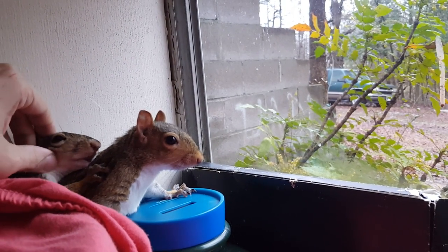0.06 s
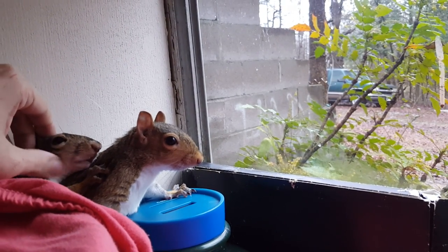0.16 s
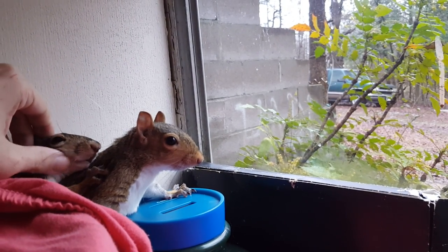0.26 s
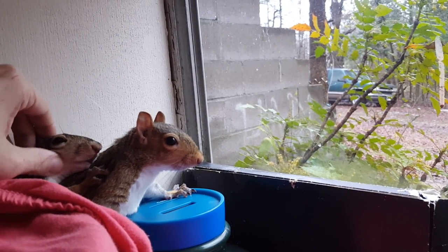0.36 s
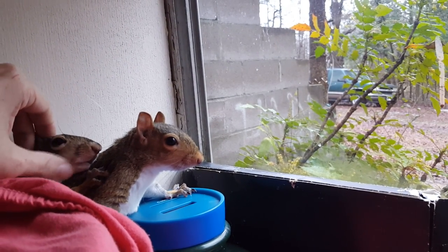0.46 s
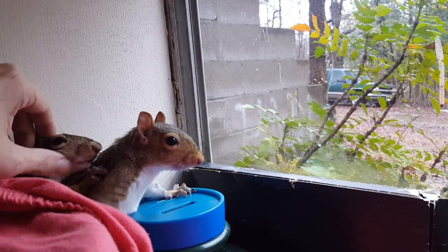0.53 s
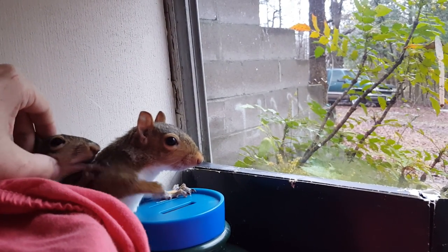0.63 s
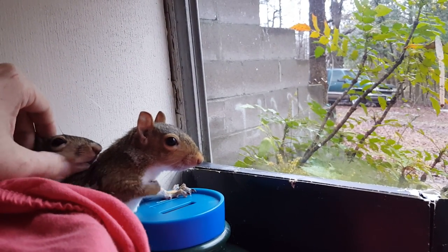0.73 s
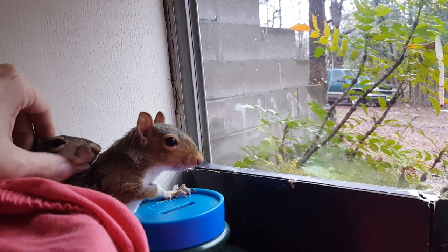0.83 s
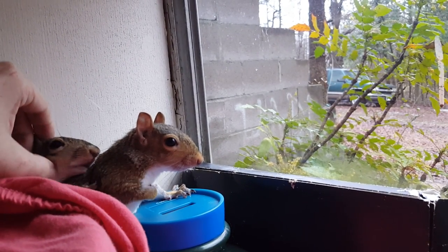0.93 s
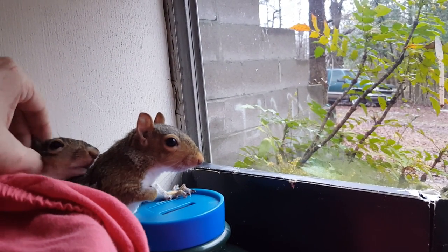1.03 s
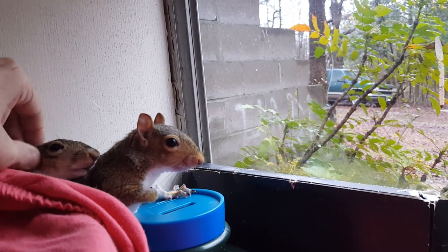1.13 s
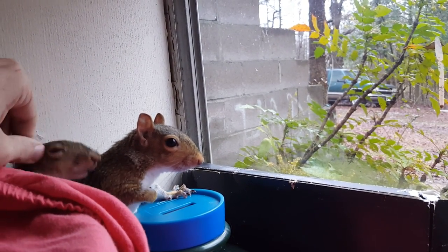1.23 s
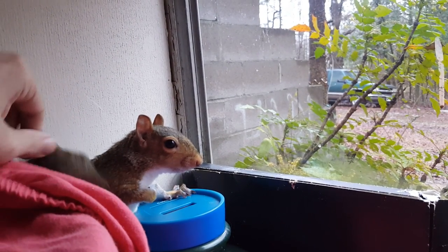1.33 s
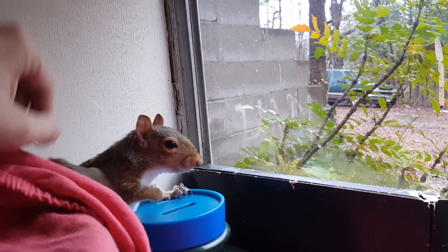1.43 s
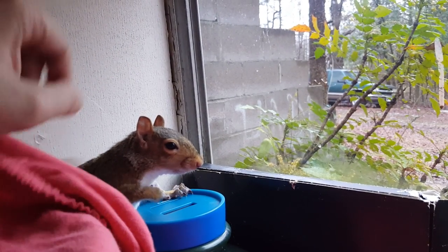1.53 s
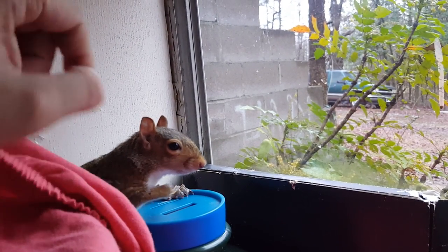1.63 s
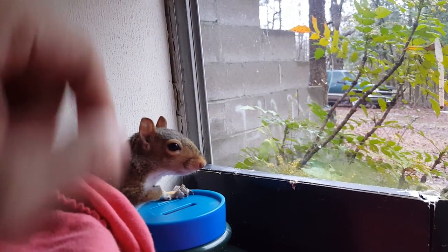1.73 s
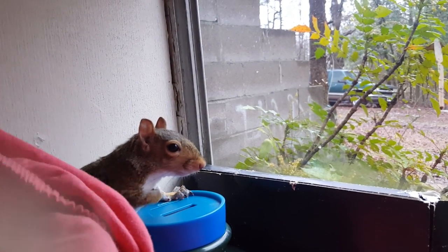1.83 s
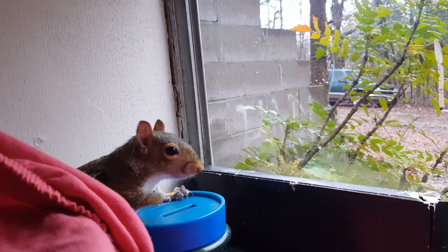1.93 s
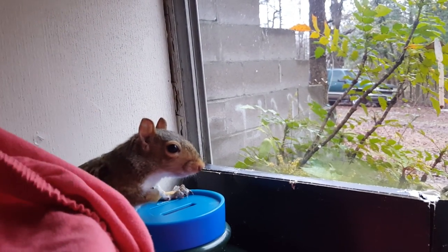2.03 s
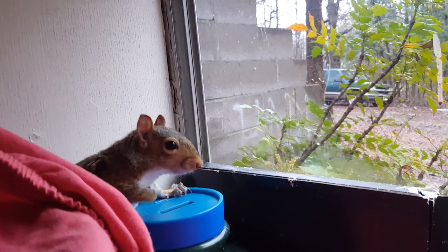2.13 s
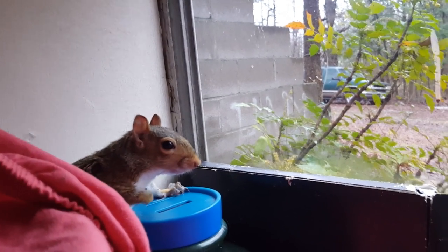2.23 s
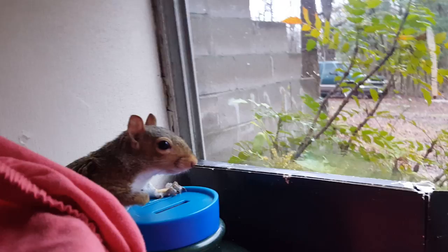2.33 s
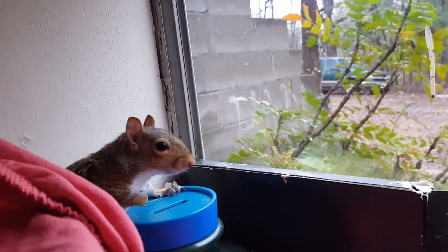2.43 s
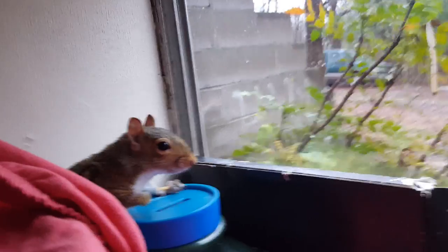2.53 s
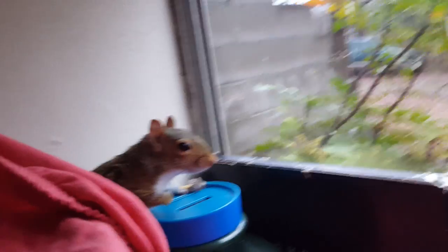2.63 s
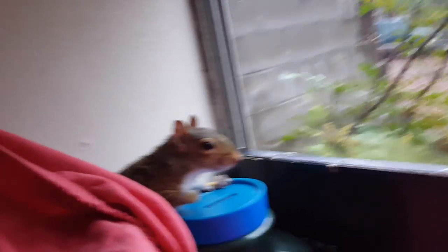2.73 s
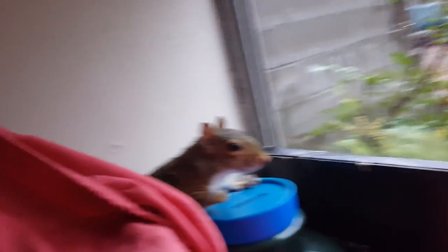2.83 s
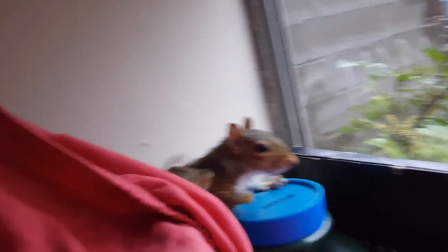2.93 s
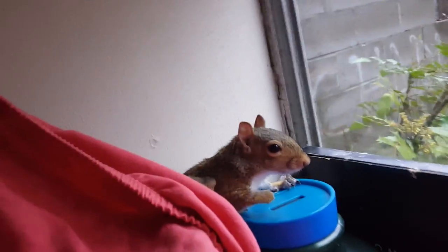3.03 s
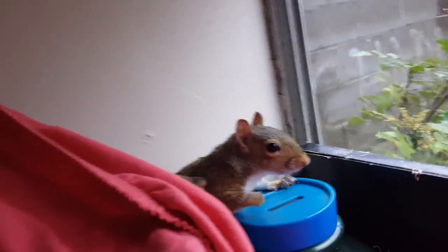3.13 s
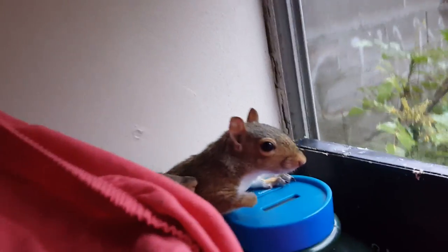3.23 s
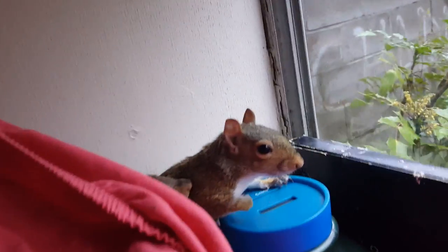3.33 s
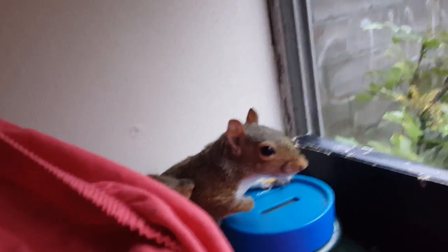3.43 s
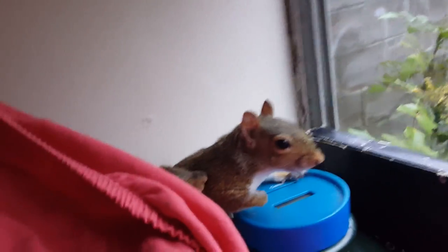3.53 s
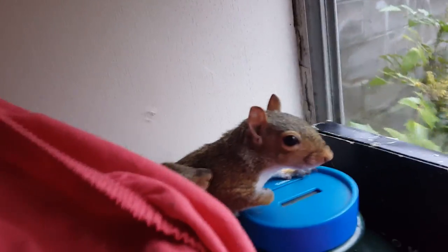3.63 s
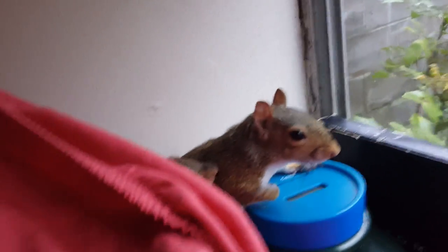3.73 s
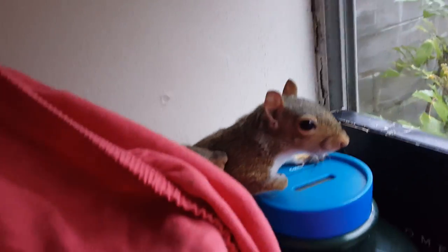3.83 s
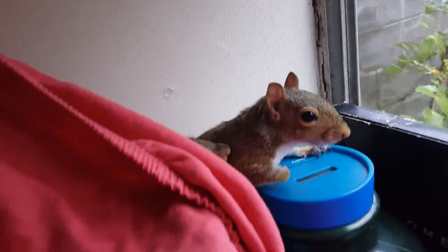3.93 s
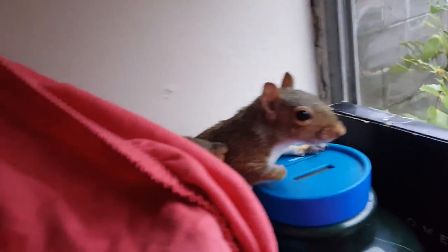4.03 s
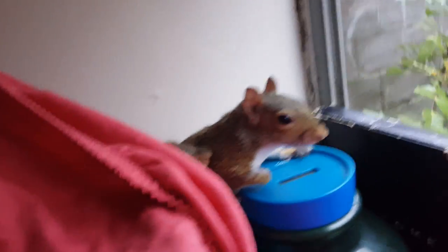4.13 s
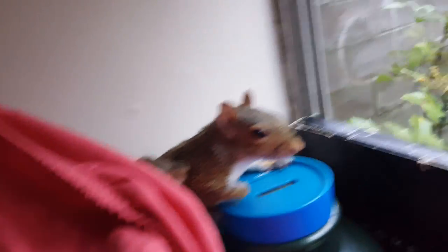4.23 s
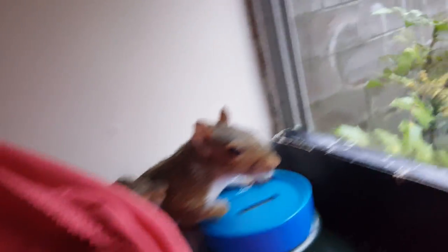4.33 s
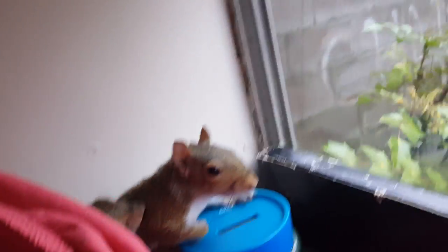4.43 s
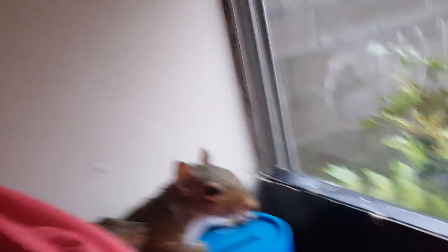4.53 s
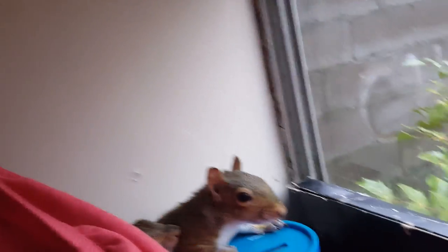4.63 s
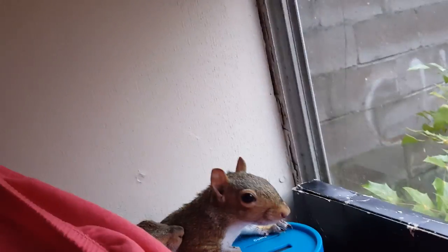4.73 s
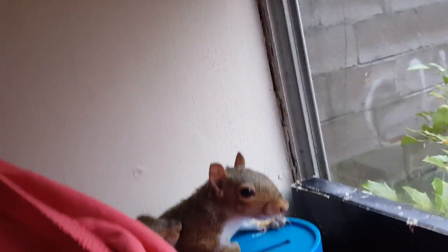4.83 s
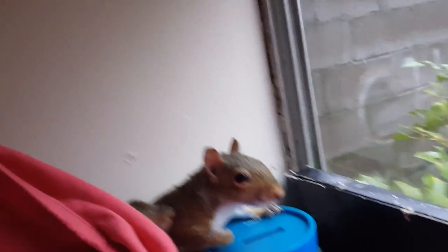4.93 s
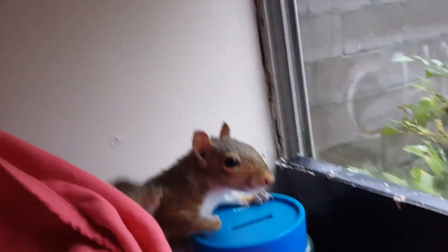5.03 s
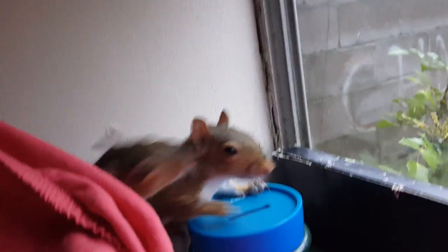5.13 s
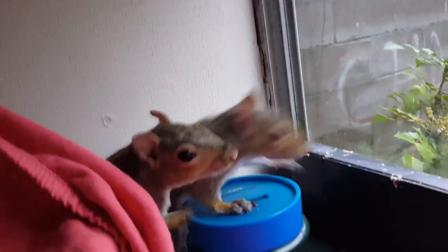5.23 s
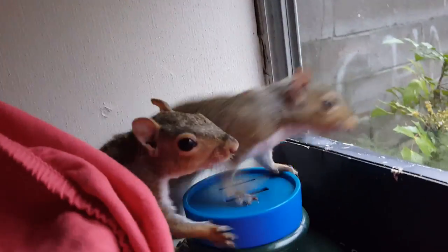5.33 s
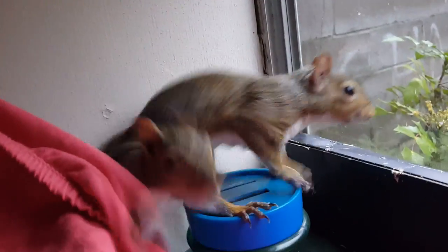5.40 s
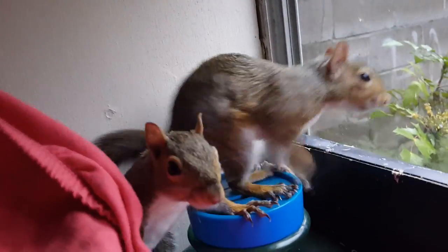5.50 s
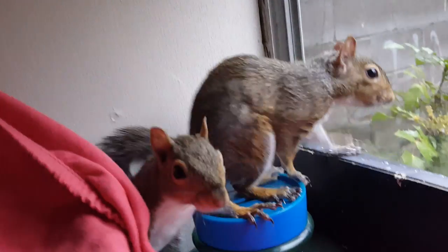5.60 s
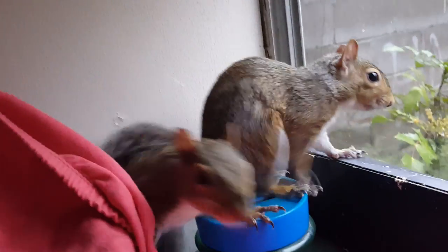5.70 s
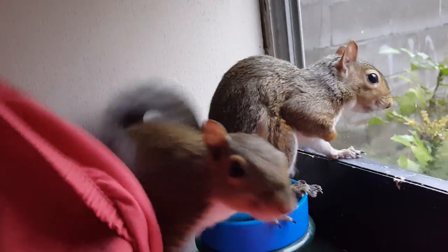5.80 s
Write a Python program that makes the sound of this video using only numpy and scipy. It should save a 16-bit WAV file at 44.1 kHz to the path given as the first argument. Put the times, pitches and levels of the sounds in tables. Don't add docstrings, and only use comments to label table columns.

```python
import sys
import numpy as np
from scipy import signal
from scipy.fft import rfft, irfft
from scipy.io import wavfile
from scipy.ndimage import uniform_filter1d

SR = 44100
rng = np.random.default_rng(int(sys.argv[2]) if len(sys.argv) > 2 else 0)


def transcribe(u):
    v = np.clip(np.atleast_2d(u).T, -1, 1)
    q = np.round(v * 32767).astype(np.int16)
    wavfile.write(sys.argv[1], SR, q)


def natural_amplitude(level_db):
    exponent = np.asarray(level_db, float) / 20
    return 10 ** exponent


N = 258426
TURN_S = (2.44, 3.88)
EDGE_HZ = 15750


def evened(x):
    return x / np.sqrt(np.mean(x ** 2) + 1e-20)


def read(points, hz):
    f, value = np.transpose(points)
    return np.interp(np.log(hz + 1), np.log(f + 1), value)


def add(mix, s, sound):
    part = mix[:, round(s * SR):][:, :sound.shape[1]]
    part += sound[:, :part.shape[1]]


def panned(db):
    return natural_amplitude(np.array([[db / 2], [-db / 2]]))


def resonate(x, hz, width_hz):
    turn = np.exp(2j * np.pi * np.cumsum(hz * np.ones(x.shape[-1])) / SR)
    r = np.exp(-np.pi * width_hz / SR)
    for _ in range(2):
        x = 2 * (turn * signal.lfilter([1 - r], [1, -r], x * turn.conj())).real
    return x


def resonate_once(x, hz, width_hz):
    turn = np.exp(2j * np.pi * hz * np.arange(1, x.shape[-1] + 1) / SR)
    r = np.exp(-np.pi * width_hz / SR)
    return 2 * (turn * signal.lfilter([1 - r], [1, -r], x * turn.conj())).real


def coloured(x, spectrum, tilt_db=0., top_hz=22000):
    hz = np.fft.rfftfreq(x.shape[-1], 1 / SR)
    db = read(spectrum, hz) + tilt_db * np.log2(np.maximum(hz, 2000) / 7000)
    return evened(irfft(rfft(x) * natural_amplitude(db) * (hz < top_hz), x.shape[-1]))


def ports(count):
    # hz, share
    alike = [(60, .995), (130, 1), (290, 0.6), (640, 0.5), (860, .3), (1050, 0), (15000, 0)]
    # hz, share
    from_left = [(800, 0), (1150, .38), (3800, .28), (5000, 0)]
    delay_s = 0.00045
    a, b = rfft(rng.standard_normal((2, count)))
    hz = np.fft.rfftfreq(count, 1 / SR)
    same = np.clip(read(alike, hz), 0, 1)
    same = same + np.clip(read(from_left, hz), 0, 1) * np.exp(-2j * np.pi * hz * delay_s)
    other = np.sqrt(np.maximum(1 - abs(same) ** 2, 0))
    return irfft(np.array([a, same * a + other * b]), count)


def fan():
    # hz, level_db_per_hz
    air_before = [(12, -61), (20, -31), (37, -47), (60, -8.5), (148, -6.5), (212, -15.5), (478, -15),
                  (514, -15), (735, -15), (789, -20), (1000, -17.5), (1180, -18), (1330, -15.5),
                  (6000, -45.5), (7800, -68), (13200, -120)]
    # hz, level_db_per_hz
    air_after = [(12, -59), (20, -28), (43, -20), (82, -14), (114, -3.5), (251, -13.5), (297, -24),
                 (478, -10.5), (607, -19), (752, -16.5), (978, -18.5), (1540, -19.5), (1650, -21.5),
                 (6000, -45.5), (7800, -84), (13200, -120)]
    # hz, left_right_db
    lean_table = [(60, -1), (110, -.6), (200, 0), (380, -0.5), (700, 3), (1290, 2), (2380, 4.5), (4400, -4),
                  (8120, 8), (15000, -18)]
    # pitch_hz, width_hz, before_db, after_db, left_right_db
    ducts = [(119, 5.4, -60, -57, -2), (145.8, 19, -61, -60.5, 1), (488.7, 27, -67.5, -59.5, -2),
             (888, 16, -74.5, -70, -6.5), (1019, 63, -69.5, -74, 10), (4080, 320, -105, -78, -2),
             (2080, 740, -69, -68, 3), (8200, 730, -89, -89, 14)]
    hz, t, z = signal.stft(ports(N + 2048), SR, nperseg=2048, noverlap=1536)
    patches = uniform_filter1d(rng.standard_normal(z.shape[1:]), 14, 0)
    patches = evened(uniform_filter1d(patches, 8, 1))
    turned = np.interp(t, TURN_S, [0, 1])
    level_db = np.outer(read(air_before, hz) - 1.5, 1 - turned) + np.outer(read(air_after, hz), turned)
    lean = read(lean_table, hz)[:, None] / 2
    z = z * natural_amplitude(level_db + 1.33 * patches + np.array([lean, -lean]))
    out = natural_amplitude(-51.5) * evened(signal.istft(z, SR, nperseg=2048, noverlap=1536)[1][:, :N])
    share = np.interp(np.arange(N) / SR, TURN_S, [0, 1])
    for pitch_hz, width_hz, before_db, after_db, pan_db in ducts:
        tone = evened(resonate(ports(N), pitch_hz, width_hz))
        out = out + tone * natural_amplitude(before_db + share * (after_db - before_db)) * panned(pan_db)
    return out


def whine():
    # pitch_hz, level_db, left_right_db
    partials = [(744, -63.5, 4), (1496, -71, -2)]

    def wander():
        return evened(uniform_filter1d(uniform_filter1d(rng.standard_normal(N), 9000), 9000))

    shadow_db = np.interp(np.arange(N) / SR, TURN_S, [-2.5, 0])
    turns = np.cumsum(1 + 0.0035 * wander()) / SR
    out = np.zeros((2, N))
    for k, (hz, db, pan_db) in enumerate(partials):
        tone = np.sin(2 * np.pi * hz * turns + np.array([[0], [0.6 * k + .5]]))
        out += np.sqrt(2) * natural_amplitude(db + 1.97 * wander() + shadow_db) * panned(pan_db) * tone
    return out


def rumble():
    # centre_s, peak_db, half_width_s, centre_hz
    swell_table = [
        (.4, -54.5, 0.18, 71),
        (2.07, -48.5, 0.3, 111),
        (3.5, -55, 0.15, 70),
        (5.3, -37.5, 0.21, 105),
        (5.65, -44, 0.11, 102),
    ]
    floor, floor_hz = natural_amplitude(-67), 140.0
    t = np.arange(N) / SR
    level, weighted_hz = floor, floor_hz * floor
    for s, db, half_s, hz in swell_table:
        swell = natural_amplitude(db) * np.exp(-((t - s) / half_s) ** 2)
        level = level + swell
        weighted_hz = weighted_hz + swell * hz
    low = resonate(ports(N), weighted_hz / level, 40.)
    return evened(low) * level * natural_amplitude(-7.5)


def squeak(s, length_s, db, start_hz, end_hz, width_hz, wavering):
    count = round(max(length_s, .02) * SR)
    a, b, uneven, waver = rng.standard_normal((4, count))

    def slow(x):
        return evened(uniform_filter1d(x, 700))

    hz = np.linspace(start_hz, end_hz, count) * (1 + wavering * slow(waver))
    tone = evened(resonate(np.array([a, 0.55 * a + 0.99 * b]), hz, width_hz))
    return s, tone * natural_amplitude(db + slow(uneven)) * signal.windows.tukey(count, .4) * panned(1.5)


def squeaks():
    # start_s, length_s, level_db, start_hz, end_hz
    rubs = [
        (0.199, 0.069, -65, 2480, 2720),
        (0.297, 0.33, -56.5, 1286, 1325),
        (0.622, 0.047, -59, 1310, 1290),
        (2.8, 0.13, -64, 960, 980),
        (3.95, 0.21, -64, 1190, 1190),
        (5.498, 0.22, -58, 1240, 1200),
        (5.7, .05, -59, 1200, 1190),
        (5.826, 0.037, -55, 1260, 1280),
    ]
    return [squeak(*row, width_hz=170., wavering=.03) for row in rubs]


def tick(s, db, hz, lid_db, length_s, tilt_db):
    # hz, level_db_per_hz
    click_colour = [(880, 2), (1500, 5), (2480, -12), (2830, -12), (3750, 3), (4730, -4), (5340, 1.5),
                    (7160, -6), (8160, -5.5), (10100, -11), (15300, -14.5), (15900, -17), (16700, -82)]
    t = np.arange(3000) / SR
    length_s = np.clip(length_s, .002, .03)
    rattle = (natural_amplitude(-9 * t / length_s) + .35 * np.exp(-t / .0007)) / (1 + (t / length_s) ** 6)
    tail = natural_amplitude(-22 - 60 * t / .07)
    uneven = evened(uniform_filter1d(rng.standard_normal(len(t)), 30))
    shape = (rattle + tail) * np.minimum(t / 0.00031, 1) * natural_amplitude(2.02 * uneven)
    top_hz = EDGE_HZ if db < -31 else 22000
    snap = coloured(rng.standard_normal((2, len(t))), click_colour, tilt_db, top_hz) * shape
    left, other = rng.standard_normal((2, len(t))) * shape
    blows = np.array([left, 0.21 * left + 1.04 * other])
    lid = resonate_once(blows, hz, 300.0 * (hz / 1500) ** 2.7) + 0.34 * resonate(blows, 1080.0, 1400.0)
    lid = signal.sosfilt(signal.butter(2, [700., 3800.], "band", fs=SR, output="sos"), lid)
    snap = snap / abs(snap).max()
    lid = lid / abs(lid).max()
    return s, natural_amplitude(db) * panned(0.29) * (snap + natural_amplitude(lid_db) * lid * panned(1))


def taps():
    # start_s, peak_db, lid_hz, lid_re_snap_db, rattle_s
    tap_table = [(.271, -57.5, 2640, 9.5, 0.011), (1.599, -52.5, 1090, 14.5, 0.034),
                 (1.925, -50, 1900, 10.5, .01), (3.029, -39.5, 1470, 11.5, 0.013),
                 (3.062, -32.5, 2280, 3.5, 0.0094), (5.178, -48, 1540, 8, .006),
                 (5.192, -48, 1540, 3, .004), (5.213, -38, 2520, 8.5, 0.0096),
                 (5.223, -39, 2780, 14, 0.0082), (5.23, -42, 1290, 18.5, 0.018),
                 (5.542, -46, 1760, -2, 0.0059), (5.629, -50, 1700, 10, 0.0053),
                 (5.649, -55, 1230, 1, .0062), (5.683, -40.5, 2330, -6, 0.0085),
                 (5.787, -56, 2480, 17, 0.014), (5.828, -50, 2470, 8, 0.0098), (5.851, -42, 2500, -1, .012),
                 (1.934, -47, 1080, 3, 0.0058), (1.603, -53, 706, 11, 0.0092)]
    return [tick(*row, tilt_db=-1) for row in tap_table]


def streaks():
    # start_s, length_s, level_db, start_hz, end_hz
    slides = [(2.183, .058, -69, 11600, 11300), (2.185, .03, -73, 6300, 6200),
              (2.205, .014, -63, 12400, 11800), (2.212, .025, -63, 6000, 5500),
              (2.265, .02, -75, 8900, 8200), (2.24, .012, -74, 4600, 4600), (2.255, .05, -79, 13000, 14500),
              (1.398, .032, -68, 8800, 8200), (1.403, .03, -70, 5600, 6200),
              (1.403, .025, -70, 15500, 15300), (1.562, .048, -68, 8300, 7800),
              (2.765, .1, -60, 1330, 1280), (3.102, .03, -69, 11000, 10800), (3.105, .02, -69, 7800, 8200),
              (2.005, .016, -58, 7600, 8600), (2.855, .07, -57, 1270, 1260), (.55, .1, -66, 1310, 1290)]
    return [squeak(*row, width_hz=.055 * row[3], wavering=.008) for row in slides]


def flick(s, db, hz, width_hz, t60_s):
    t = np.arange(2500) / SR
    ring = resonate(rng.standard_normal((2, len(t))), hz, width_hz)
    ring = coloured(ring, [(100, 0), (20000, 0)], 0, EDGE_HZ)
    return s, natural_amplitude(db - 9 - 60 * t / t60_s) * np.minimum(t / .0006, 1) * ring * panned(1.5)


def flicks():
    # start_s, peak_db, ring_hz, width_hz, t60_s
    flick_table = [(1.3178, -27, 5860, 1000, 0.022), (1.321, -33, 5350, 1200, 0.02),
                   (1.9495, -15, 15200, 700, 0.031), (1.9497, -20, 5470, 600, 0.027),
                   (1.953, -27, 5440, 700, 0.027), (1.9505, -14, 14000, 900, .015),
                   (2.205, -48, 15500, 600, .02), (2.21, -57, 11700, 1000, .05),
                   (2.221, -49, 8400, 600, .015), (2.23, -50, 9500, 600, .015),
                   (2.213, -55, 5700, 900, .04), (2.896, -50, 7000, 1500, .05),
                   (3.0, -27, 9000, 8000, .011), (3.0045, -30, 6000, 4000, .011),
                   (3.0105, -32, 11000, 6000, .011), (3.016, -32, 9000, 8000, .011),
                   (3.113, -60, 11000, 1200, .05), (3.147, -47, 14500, 3000, .012),
                   (5.311, -26, 6960, 1500, 0.024), (5.364, -21, 5460, 900, 0.036),
                   (5.427, -28, 3500, 1500, .015), (5.432, -37, 2980, 2000, .012),
                   (5.573, -46, 6000, 4000, .015), (5.59, -38, 12500, 4000, .02),
                   (5.648, -45, 6000, 1800, .015), (5.683, -48, 8300, 1200, .02),
                   (5.764, -37, 7100, 800, .02), (5.772, -34, 13900, 3500, .02),
                   (1.533, -56, 5500, 5000, .02), (1.3185, -32, 3400, 2500, .02),
                   (1.447, -50, 8280, 1210, .015), (1.592, -49, 7500, 2000, .05),
                   (1.405, -55, 5500, 1500, .05), (3.063, -40, 7500, 3000, .02),
                   (5.291, -26, 3800, 1200, 0.017)]
    return [flick(*row) for row in flick_table]


def snaps():
    # start_s, peak_db, lid_hz, lid_re_snap_db, rattle_s
    snap_table = [(1.318, -28.5, 1030, -3, 0.009), (1.448, -47, 1390, -4, 0.0072),
                  (1.9504, -15, 1850, -11, 0.0071), (2.02, -32.5, 1270, -30, 0.0052),
                  (2.371, -47.5, 1580, -4, 0.0069), (2.989, -20, 1920, -12.5, 0.0061),
                  (2.993, -28, 1900, -14, 0.004), (3.023, -22.5, 1800, -9, 0.0088),
                  (3.0595, -32.5, 2100, -18, 0.009), (3.137, -43, 1220, -5, 0.0018),
                  (3.307, -53, 1510, -15, .012), (5.1345, -43, 1500, -6, 0.005),
                  (5.262, -30, 1200, -7, .0045), (5.289, -21.5, 1240, 1, 0.0062),
                  (5.311, -18, 1180, -13, 0.005), (5.364, -16.5, 1600, -13, .011),
                  (5.404, -25, 1360, -17, 0.0045), (5.441, -19, 2580, -5, 0.0065),
                  (5.473, -22.5, 1890, -6, 0.011), (5.575, -42, 1680, -12, 0.011),
                  (5.588, -40.5, 1210, -23, .008), (5.76, -51, 1760, -10, .008),
                  (5.7725, -36, 1750, 5.5, 0.004), (5.283, -35, 1300, -17, .0044)]
    return [tick(*row, tilt_db=4 + 0.07 * (row[1] + 30)) for row in snap_table]


def drag(s, length_s, hiss_db, fall_db, lid_db, tilt_db):
    # hz, level_db_per_hz
    slip_colour = [(1470, -7.5), (2500, -7), (3280, -9.5), (4800, -5.5), (5070, -6), (5900, -7.5),
                   (6860, -7), (9960, -13.5), (15100, -12.5), (16000, -18), (16700, -46)]
    count = 2 * round(length_s * SR / 2)
    z = signal.stft(rng.standard_normal((2, count)), nperseg=256)[2]
    patches = uniform_filter1d(rng.standard_normal(z.shape[1:]), size=9, axis=0)
    patches = evened(uniform_filter1d(patches, size=3, axis=1))
    noise = signal.istft(z * natural_amplitude(3 * patches), nperseg=256)[1][:, :count]
    noise = noise * natural_amplitude(2.5 * evened(uniform_filter1d(rng.standard_normal(count), 70)))
    hiss = coloured(noise, slip_colour, tilt_db, EDGE_HZ)
    lid = evened(resonate(noise, 780.0, 2600.0))
    shape = natural_amplitude(hiss_db - fall_db * np.linspace(-.5, .5, count)) * signal.windows.tukey(count, .55)
    return s, (hiss + natural_amplitude(lid_db) * lid) * shape * panned(1.1)


def rustles():
    # start_s, length_s, hiss_db, fall_over_stroke_db
    brushes = [(1.331, 0.061, -68, 6), (1.385, 0.056, -61, -4), (1.435, 0.13, -67.5, -4),
               (1.551, 0.086, -61, 6), (1.615, 0.12, -70.5, 7), (1.946, 0.097, -51.5, 0),
               (2.181, 0.055, -62, -7), (2.226, 0.093, -67, 11), (2.991, 0.049, -54, -3),
               (3.15, .66, -70, -3), (5.364, 0.091, -43.5, -4)]
    return [drag(*row, lid_db=-13, tilt_db=-0.6) for row in brushes]


def thud(s, db, hz, t60_s, pan_db):
    lag_s = 1.5e-5 * np.maximum([[-pan_db], [pan_db]], 0)
    t = np.maximum(np.arange(9000) / SR - lag_s, 0)
    rise_s = 0.05 * t60_s + 0.41 / hz
    shape = np.sin(np.pi / 2 * np.minimum(t / rise_s, 1)) ** 2
    shape = shape * natural_amplitude(-60 * np.maximum(t - rise_s, 0) / t60_s)
    swing = np.sin(2 * np.pi * hz * t)
    swing = swing + 0.25 * np.sin(2 * np.pi * (1.5 * hz * t + rng.random()))
    swing = swing + 0.27 * np.sin(2 * np.pi * 0.614 * hz * t)
    jostle = evened(resonate(ports(t.shape[1]), 2.0 * hz, 4.2 * hz))
    return s, natural_amplitude(db) * panned(pan_db) * shape * (swing + 0.19 * jostle * np.clip(hz / 320, 0, 1))


def thuds():
    # start_s, peak_db, pitch_hz, t60_s
    landings = [(1.453, -42, 148, .035), (1.599, -29, 102, 0.12), (1.6, -30, 153, 0.1),
                (1.925, -25.5, 161.7, .2), (1.962, -31, 123, 0.086), (2.888, -24.5, 119, .067),
                (2.888, -31, 92, 0.088), (2.898, -31, 152.7, 0.16), (3.03, -32, 183, 0.054),
                (5.109, -30, 161, 0.038), (5.159, -39.5, 140, 0.2), (5.253, -36, 127.2, 0.38),
                (5.329, -34.5, 151, 0.21), (5.379, -28.5, 123, 0.34), (5.474, -21.5, 162.6, 0.17),
                (5.556, -30.5, 166, 0.069), (5.744, -39, 165, 0.089), (5.788, -23.5, 161, 0.058),
                (5.826, -38, 119, 0.16)]
    return [thud(*row, pan_db=0.7) for row in landings]


def contacts():
    # start_s, peak_db, pitch_hz, t60_s, left_right_db
    contact_table = [
        (1.6065, -27, 260, .02, 0),
        (1.6, -38, 520, .015, 0),
        (5.381, -32, 900, .01, 2),
        (2.198, -50, 800, .03, 0),
    ]
    return [thud(*row) for row in contact_table]


def more_flicks():
    # start_s, peak_db, ring_hz, width_hz, t60_s
    more_flick_table = [(5.1355, -42, 13500, 3500, .012), (5.141, -42, 5500, 4000, .018),
                        (5.176, -46, 9000, 9000, .012), (5.192, -44, 4800, 2000, .015),
                        (5.2135, -36, 12000, 8000, .015), (5.284, -32, 14000, 3000, .025),
                        (5.235, -38, 14500, 2500, .025), (5.417, -36, 7000, 5000, .012),
                        (5.426, -34, 7500, 4000, .015), (3.115, -50, 11000, 9000, .01),
                        (3.308, -54, 8200, 1200, .02), (3.308, -58, 9600, 900, .015),
                        (2.198, -54, 3500, 1200, .03), (5.683, -46, 13000, 4000, .015),
                        (2.834, -58, 6000, 5000, .012), (2.955, -56, 6000, 5000, .012),
                        (1.5995, -44, 900, 900, .02), (2.032, -46, 9000, 9000, .012),
                        (2.9895, -22, 6000, 1800, .035), (5.396, -36, 8000, 8000, .01),
                        (5.245, -41, 6000, 6000, .01), (5.253, -38, 9000, 8000, .01)]
    return [flick(*row) for row in more_flick_table]


def knocks():
    # start_s, peak_db, pitch_hz, t60_s, left_right_db
    knock_table = [(1.602, -34, 320, 0.047, -2), (1.929, -40, 277, 0.23, 8), (1.935, -37.5, 656, 0.095, 8),
                   (3.03, -29, 475, 0.035, -1.5), (5.222, -24.5, 324, 0.043, -3),
                   (5.224, -31.5, 510, 0.077, -2), (5.225, -24, 977, 0.028, -4),
                   (5.2242, -13, 2260, .01, 4), (5.225, -23.5, 1770, 0.017, 13),
                   (5.381, -24, 246, 0.03, -.5), (5.474, -29.5, 477, 0.035, 8),
                   (5.476, -35.5, 855, 0.048, 5), (5.48, -28.5, 270.5, 0.11, -5),
                   (5.683, -18, 470, 0.019, 3), (5.697, -38, 467, 0.021, 3), (5.781, -31, 278, 0.055, -1),
                   (1.941, -37, 396, 0.03, 11), (1.604, -41, 590, 0.029, -1)]
    return [thud(*row) for row in knock_table]


def more_knocks():
    # start_s, peak_db, pitch_hz, t60_s, left_right_db
    more_knock_table = [(1.917, -37.5, 230, 0.065, 8), (1.932, -39.5, 530, 0.15, 9),
                        (1.971, -46.5, 380, 0.26, 4), (1.972, -42.5, 640, .1, 7), (1.984, -47, 780, .05, 5),
                        (2.055, -46.5, 216, .1, 4), (1.7, -59, 240, 0.15, 3), (5.226, -22.5, 1380, .015, 4),
                        (5.38, -34.5, 1180, 0.015, 8), (5.292, -27.5, 2420, 0.016, 3),
                        (5.549, -45, 320, 0.15, -2), (5.69, -34.5, 350, .06, 0), (5.785, -42.5, 790, 0.063, 3),
                        (1.96, -43.5, 510, .12, 0), (1.953, -38, 1470, .02, 3)]
    return [thud(*row) for row in more_knock_table]


def scrapes():
    # start_s, length_s, hiss_db, fall_over_stroke_db, lid_re_hiss_db
    scrape_table = [(1.919, 0.032, -54, -4, 9), (2.83, 0.065, -65, -3, 3), (2.889, 0.032, -55, 6, -4),
                    (2.93, 0.061, -66, -4, 9), (3.049, .14, -61, 12, 0), (5.095, 0.135, -57, -14, -2),
                    (5.204, 0.081, -46, 10, 8.5), (5.258, 0.075, -50, -7, 3.5), (5.325, 0.039, -61, 0, 2),
                    (5.438, 0.032, -49, 20, 1.5), (5.478, 0.061, -60.5, 14, 7), (5.503, .11, -71, 7, 15.5),
                    (5.595, .15, -76.5, 6, 21), (5.731, 0.073, -56, -13, 1),
                    (5.781, 0.09, -55.5, -16, -0.5)]
    return [drag(*row, tilt_db=-1) for row in scrape_table]


GRUNT_S, GRUNT_LENGTH_S, GRUNT_DB = 2.192, 0.041, -28.5


def grunt():
    # hz, level_db_per_hz
    nose = [(2060, -44), (3500, -17), (5500, -2), (7820, -6), (8540, -2), (10200, -6), (11700, 0),
            (14100, -32), (15700, -7)]
    s = np.arange(0, GRUNT_LENGTH_S, 1 / SR)
    u = s / GRUNT_LENGTH_S
    level = np.minimum(s / 0.012, 1) * np.minimum((GRUNT_LENGTH_S - s) / 0.0062, 1)
    level = level * natural_amplitude(GRUNT_DB - 8.5 * u)
    pitch_hz = 267.5 * (1 + 0.33 * np.exp(-s / 0.0066))
    a = 2 * np.pi * np.cumsum(pitch_hz) / SR
    upper = np.cos(2 * a) + 0.12 * np.cos(3 * a) + 0.095 * np.cos(4 * a) + 0.081 * np.cos(5 * a)
    voice = np.cos(a) + natural_amplitude(-24 + 22.5 * u ** 2) * upper
    t = np.arange(3000) / SR
    out = natural_amplitude(-52) * coloured(rng.standard_normal((2, 3000)), nose, 0, EDGE_HZ)
    out = out * np.exp(-((t - .04) / 0.015) ** 2)
    add(out, .012, np.sqrt(2) * level * voice * panned(-2.5))
    return GRUNT_S - .012, out


def rasp():
    count = round(GRUNT_LENGTH_S * SR)
    air = resonate(ports(4000), 470, 450.)[:, :count]
    return GRUNT_S, evened(air) * natural_amplitude(GRUNT_DB - 17) * signal.windows.tukey(count, .45)


def scene():
    near = np.zeros((2, N))
    for sound in taps() + snaps() + rustles() + thuds() + knocks() + scrapes() + [grunt()]:
        add(near, *sound)
    near = near + 0.44 * resonate(near, 15000.0, 1510.0)
    near = near + 0.63 * resonate(near, 8150.0, 1700.0)
    near = signal.sosfilt(signal.butter(2, 65., "high", fs=SR, output="sos"), near)
    mix = fan() + whine() + rumble() + near
    for sound in squeaks() + streaks() + flicks() + contacts() + more_flicks() + more_knocks() + [rasp()]:
        add(mix, *sound)
    return mix


def top_cut(x):
    return signal.sosfilt(signal.butter(12, 16650, fs=SR, output="sos"), x)


def record(dry):
    # hz, level_db_per_hz
    self_noise = [(2400, -14), (3200, -2), (4500, -2.5), (4870, -7), (7200, -7.5), (8300, -10.5),
                  (10700, -14.5), (15000, -9), (15700, -7)]
    hiss = coloured(rng.standard_normal(dry.shape), self_noise, 0, EDGE_HZ) * natural_amplitude(-74.8) * panned(1.3)
    low_pass = signal.firwin(127, 16150, window=("kaiser", 9), fs=SR)
    dry = signal.oaconvolve(dry, low_pass[None], "same")
    return top_cut(dry + hiss - .0006)


dry = scene()
out = record(dry)
transcribe(out)
```